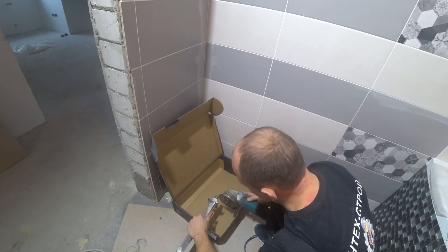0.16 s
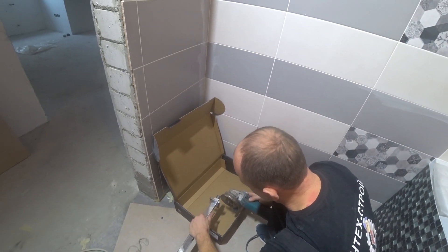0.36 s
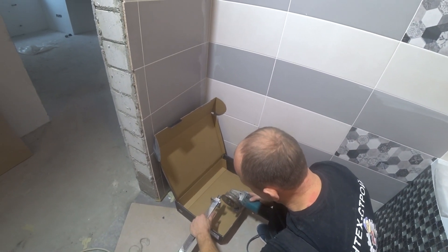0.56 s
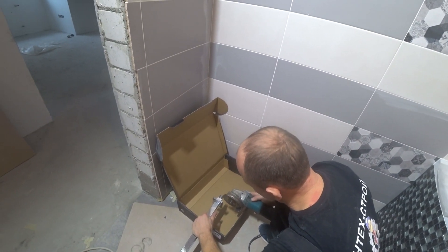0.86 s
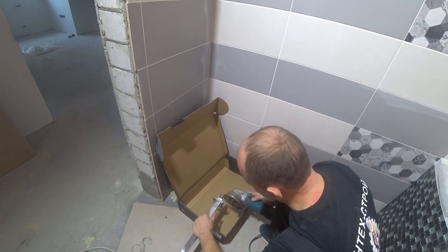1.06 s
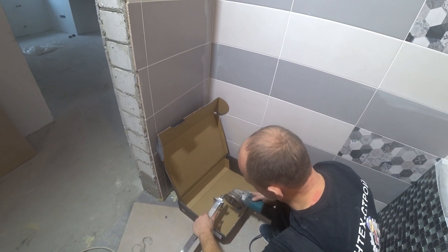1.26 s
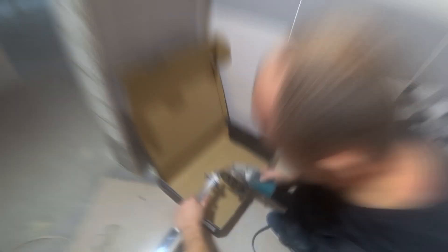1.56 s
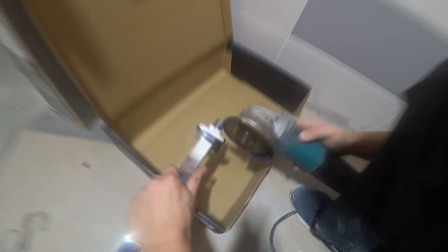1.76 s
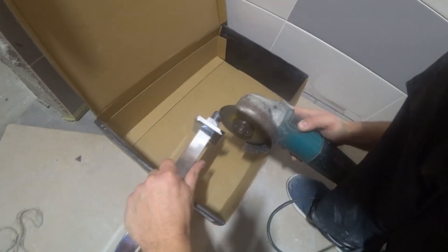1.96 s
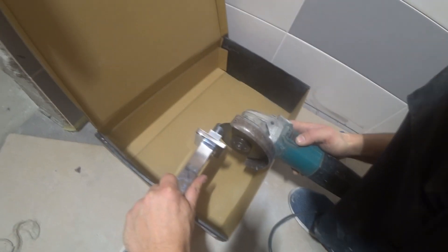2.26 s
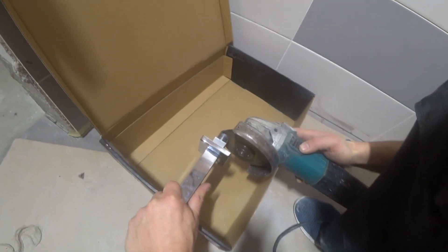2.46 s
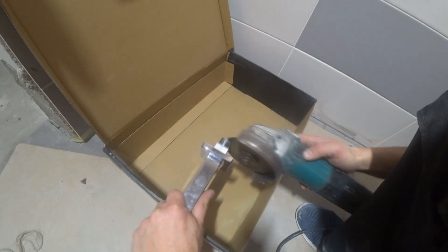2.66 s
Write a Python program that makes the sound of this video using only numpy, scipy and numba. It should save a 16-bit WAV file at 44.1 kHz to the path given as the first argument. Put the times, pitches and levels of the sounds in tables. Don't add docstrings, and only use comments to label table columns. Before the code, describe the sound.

An angle grinder cuts a metal sleeve in a small tiled room. From 0 to 1.3 seconds it is loud, dense and gritty, with ringing around 3 to 6 kHz and a rough metallic body. At 1.34 seconds it jumps abruptly to a quieter cut, its lows thinning toward 2.4 seconds with wavering metallic tones, then returning by 2.6. Faint motor whine, thin high squeal, short bright reverberation.

```python
import sys
import numpy as np
from scipy import signal
from scipy.fft import rfft, irfft, next_fast_len
from scipy.io import wavfile
from scipy.ndimage import map_coordinates
from numba import njit

SR = 44100
rng = np.random.default_rng(int(sys.argv[2]) if len(sys.argv) > 2 else 0)


def amplitude_ratio(level_db):
    exponent = np.asarray(level_db, float) / 20
    return 10 ** exponent


def to_wav(sig):
    pcm = np.clip(np.atleast_2d(sig), -1, 1) * 32767
    pcm = np.round(pcm).astype(np.int16)
    wavfile.write(sys.argv[1], SR, pcm.T)


N = 123479
SCENE_CHANGE_S = 1.340

# time in seconds, grinding level in dB, bite in dB.
CUTS = [
    [(0, -15, -9), (.1, -14, -11), (.26, -14.5, -13), (.44, -14.5, -9.5), (.59, -15, -8), (.81, -14, -12),
     (.93, -14, -8.5), (1.06, -15.5, -9), (1.335, -14, -12.5)],
    [(1.345, -23, -13.5), (1.49, -21, -11.5), (1.66, -20, -16.5), (1.84, -18.5, -19.5), (1.96, -19, -22),
     (2.1, -19.5, -26), (2.44, -19, -30), (2.58, -17.5, -17), (2.8, -19, -15)],
]
# frequency in Hz, level in dB.
GRIT_COLOUR = [(1100, -53), (1640, -26), (1800, -11.5), (3300, -1.5), (7000, -3.5), (8500, -11),
               (12500, -13.5), (16000, -26)]
# centre in seconds, treble lift in dB (below 0 darkens),
# length in seconds.
PUSHES = [(0.11, 1, 0.088), (0.335, 0.5, 0.07), (0.423, -4, 0.12), (0.497, -2.5, 0.03), (0.737, 1.5, 0.14),
          (.9, 0.5, .08), (1.057, 0, .06), (1.213, 1.5, 0.23), (1.405, 1.5, .15), (1.843, 1, 0.13),
          (2.24, -0.5, .08), (2.5, -0.5, 0.11)]
# frequency in Hz, width in Hz, level in dB.
FIRST_RINGS = [(2568, 40, -8), (3412, 30, -7), (3570, 30, -5), (3724, 36, -3), (3775, 26, -5),
               (4080, 34, -7), (4250, 36, -9), (4802, 60, -6), (5318, 36, -8), (5860, 50, -8),
               (6360, 70, -8), (7000, 60, -12), (11600, 160, -20)]
# frequency in Hz, width in Hz, level in dB.
SECOND_RINGS = [(2660, 90, -4), (3090, 60, -6), (3410, 50, -7), (3725, 45, -2), (4085, 40, -6),
                (4230, 50, -5), (4800, 80, -6), (5330, 60, -5), (6170, 45, -3), (6520, 45, -6),
                (6980, 45, -7), (7630, 50, -9), (10080, 300, -13), (11310, 200, -17)]
# centre in seconds, frequency in Hz, level in dB against the grinding, length in seconds.
FLARES = [(.2, 4810, -20, 0.23), (.21, 6220, -10, .08), (0.541, 3710, -4.5, 0.042),
          (0.676, 1975, -10, 0.061), (0.725, 5850, -10, .08), (0.834, 4010, -10, 0.15),
          (0.848, 1993, -9, 0.05), (1.048, 1112, -9, 0.044), (1.22, 5320, -13, 0.16),
          (1.257, 5930, -12, .14), (1.388, 1824, -6.5, 0.084), (1.436, 862, -16, 0.11),
          (1.466, 3660, -8.5, 0.32), (1.492, 1110, -14, 0.038), (1.54, 1964, -21, 0.4),
          (1.622, 990, -34, 0.073), (1.704, 6200, -12.5, 0.24), (1.784, 5350, -15, 0.25),
          (1.447, 4350, -12, 0.17), (1.617, 3490, -16.5, .15), (2.75, 3656, -9, 0.18),
          (1.81, 2110, -9.5, 0.092), (1.852, 1320, -20.5, 0.13), (1.882, 1785, -14, 0.14),
          (2.01, 1777, -13, 0.19), (1.907, 970, -27, 0.079), (1.915, 5900, -5, .1), (1.967, 6030, -9, 0.12),
          (1.938, 393.4, -32, 0.068), (2.044, 395, -30, 0.084), (1.98, 6650, -11, 0.48),
          (2.004, 1068, -24, 0.093), (2.155, 1055, -26.5, 0.25), (2.095, 2110, -28, .14),
          (2.09, 6570, -6, 0.27), (2.115, 6300, -7, 0.33), (2.3, 1330, -34, 0.49),
          (2.386, 1110, -22.5, 0.096), (2.396, 3007, -12.5, .3), (2.39, 1803, -23.5, 0.53),
          (2.524, 1480, -27, .1), (2.57, 1930, -14.5, 0.26), (2.532, 2400, -19, 0.17),
          (0.102, 1118, -17.5, 0.11), (0.57, 1120, -13, 0.081), (0.917, 1150, -16, 0.054),
          (2.757, 883, -27, .08), (2.547, 6060, -14, 0.33), (2.74, 2642, -13, 0.3)]
# frequency in Hz, level in dB.
FIRST_LOWS = [(100, -42), (300, -29.5), (600, -21), (760, -8.5), (860, -4.5), (1130, -1.5), (2000, -1),
              (4000, -7.5)]
# frequency in Hz, level in dB.
SECOND_LOWS = [(100, -47), (600, -33), (880, -13), (1130, -4), (1350, -5), (1580, -6.5), (1900, 0.5),
               (4000, -43)]
# frequency in Hz, width in Hz, level in dB.
SLEEVE_MODES = [(400, 30, -22), (875, 36, -5), (1127, 30, 0), (1273, 28, -2), (1600, 22, -3),
                (1780, 34, -4), (1971, 28, 1), (2120, 34, -3)]
# time in seconds, pitch in Hz, level in dB.
SQUEAL = [(0, 14170, -60), (.7, 14170, -54), (.78, 14170, -44), (.86, 14170, -51), (1.1, 14180, -42),
          (1.335, 14180, -41), (1.35, 14150, -60), (1.52, 14130, -60), (1.66, 14130, -46),
          (1.84, 14120, -50), (1.95, 14040, -38), (2.03, 13990, -45), (2.22, 13980, -47),
          (2.45, 14020, -51), (2.8, 14040, -60)]
# time in seconds, level in dB.
WHINE = [(0, -70), (.1, -44), (.26, -63), (.45, -37.5), (.56, -64), (.8, -56), (.93, -52), (1.1, -47.5),
         (1.33, -82), (1.44, -72), (1.49, -57), (1.6, -44), (1.68, -49), (1.73, -60), (1.83, -48.5),
         (1.97, -58), (2.58, -54), (2.73, -41)]
# frequency in Hz, level in dB.
RUMBLE_COLOUR = [(20, -12), (150, -8), (300, -5.5), (450, -1.5), (700, -4), (1200, -27)]
# frequency in Hz, side level against mid in dB.
ROOM_WIDTH = [(60, -24), (130, -22), (250, -19), (400, -12.5), (700, -9.5), (2400, -8), (4400, -10),
              (11500, -10.5), (12800, -17)]


@njit
def svf(x, g, k):
    y, b, l = np.empty(len(x)), 0., 0.
    for i in range(len(x)):
        v = (b + g[i] * (x[i] - l)) / (1 + g[i] * (g[i] + k))
        b = 2 * v - b
        l = l + 2 * g[i] * v
        y[i] = k * v
    return y


def band(x, hz, width_hz, drift):
    return svf(x, np.tan(np.pi * hz / SR) * (1 + drift), 1. * width_hz / np.mean(hz))


def steep(x, hz, width_hz, drift):
    once = band(x, hz, 1.27 * width_hz, drift)
    return band(once, hz, 1.27 * width_hz, drift)


def unit(x):
    return x / np.sqrt(np.mean(x ** 2))


def colour(x, table):
    hz, db = np.array(table, float).T
    n = next_fast_len(len(x), True)
    f = np.maximum(np.fft.rfftfreq(n, 1 / SR), 1)
    gain = amplitude_ratio(np.interp(np.log(f), np.log(hz), db))
    return irfft(rfft(x, n) * gain, n)[:len(x)]


def low_pass(order, hz):
    return signal.butter(order, hz, fs=SR, output="sos")


def treble_of(x, hz):
    return signal.sosfiltfilt(signal.butter(2, hz, "high", fs=SR, output="sos"), x)


def walk(rate):
    steps = rng.standard_normal(400)
    places = np.arange(N // 64 + 2) * 64 * min(rate, 100) / SR
    coarse = map_coordinates(steps, [places], mode="mirror")
    return np.interp(np.arange(N), np.arange(len(coarse)) * 64, coarse)


def bell(t, centre_s, length_s):
    return np.exp(-2 * ((t - centre_s) / (length_s / 2)) ** 2)


def control(column):
    t = np.arange(N) / SR
    first, second = (np.interp(t, np.array(cut)[:, 0], np.array(cut)[:, column]) for cut in CUTS)
    return np.where(t < SCENE_CHANGE_S, first, second)


def grit():
    grains_per_s, spread_db, turn_hz, turn_depth = 26000, 1.8, 170, 0.08
    struck = rng.random(N) < grains_per_s / SR
    force = amplitude_ratio(-spread_db * np.log(1 - rng.random(N)))
    hits = struck * force * rng.choice([-1., 1.], N)
    turn = np.cumsum(turn_hz * (1 + 0.0331 * walk(2.4))) / SR
    pulse = 1 + turn_depth * np.cos(2 * np.pi * turn)
    return unit(hits) * pulse * amplitude_ratio(.5 * walk(9.34) + 0.55 * walk(70))


def hiss(grains):
    spark_hz, spark_db, spark_per_bite = 9800, -10, 1
    base = unit(colour(grains, GRIT_COLOUR))
    spark_gain = amplitude_ratio(spark_db - spark_per_bite * (control(2) + 19))
    return surge(base + spark_gain * treble_of(base, spark_hz), grains)


def surge(x, grains):
    t = np.arange(N) / SR
    push_db = sum(db * bell(t, s, length) for s, db, length in PUSHES)
    gain = amplitude_ratio(.9 * walk(23.95) + push_db)
    sheen = unit(steep(grains, 9770, 280, np.zeros(N)))
    sheen_fade = 1 / (1 + np.exp((t - 0.98) / 0.042))
    return x + (gain - 1) * treble_of(x, 4500) + gain * amplitude_ratio(-18) * sheen * sheen_fade


def ring(grains, modes, patchy_db, rate):
    total = np.zeros(N)
    for hz, width_hz, db in modes:
        level = amplitude_ratio(db + patchy_db * walk(rate))
        total += level * steep(grains, hz, width_hz, 0.0022 * walk(3.79))
    return unit(total)


def rings(grains):
    ridge = amplitude_ratio(-12 + .8 * walk(20)) * unit(steep(grains, 3740, 110, 0.0013 * walk(6.9)))
    first = amplitude_ratio(-12.5) * ring(grains, FIRST_RINGS, patchy_db=6.5, rate=9.6) + ridge
    second = amplitude_ratio(-10.5) * ring(grains, SECOND_RINGS, patchy_db=2.5, rate=12)
    return np.where(np.arange(N) / SR < SCENE_CHANGE_S, first, second)


def flares(grains):
    out, waver = np.zeros(N), .004 * walk(14)
    for s, hz, db, length in FLARES:
        i = np.arange(max(int((s - length) * SR), 0), min(int((s + length) * SR), N))
        width_hz = .021 * hz ** .8 * 1500 ** .2
        sung = unit(steep(grains[i], hz, width_hz, waver[i]))
        out[i] += amplitude_ratio(db) * bell(i / SR, s, length) * sung
    return out


def sleeve(grains):
    bite_top_hz, deep_hz, deep_per_bite = 3000, 970, 1
    dull = signal.sosfilt(low_pass(2, bite_top_hz), grains[::-1])
    first = np.arange(N) / SR < SCENE_CHANGE_S
    lows = np.where(first, unit(colour(dull, FIRST_LOWS)), unit(colour(dull, SECOND_LOWS)))
    lows = lows * amplitude_ratio(.6 * walk(11.9))
    body = amplitude_ratio(3) * lows + amplitude_ratio(-3.5) * ring(grains, SLEEVE_MODES, patchy_db=0.5, rate=8.64)
    deep = signal.sosfiltfilt(low_pass(3, deep_hz), body)
    deep_gain = amplitude_ratio(deep_per_bite * np.minimum(control(2) + 11, 0))
    return amplitude_ratio(control(2)) * (body + (deep_gain - 1) * deep)


def squeal():
    t = np.arange(N) / SR
    when, hz, db = np.array(SQUEAL).T
    tone = band(rng.standard_normal(N), np.interp(t, when, hz), 110, .002 * walk(15))
    return unit(tone) * amplitude_ratio(np.interp(t, when, db) + 1.5 * walk(16))


def grinder():
    grains = grit()
    contact = amplitude_ratio(0.08) * hiss(grains) + rings(grains) + flares(grains) + sleeve(grains)
    return amplitude_ratio(control(1)) * contact + squeal()


def motor():
    armature_hz = 565.2 * (1 + .007 * walk(25))
    tone = np.sqrt(2) * np.sin(2 * np.pi * np.cumsum(armature_hz) / SR)
    whine_db = np.interp(np.arange(N) / SR, *np.array(WHINE).T) + 1.5 * walk(18)
    rumble_db = -60.5 + 0.43 * (control(1) + 28.0)
    rumble = unit(colour(rng.standard_normal(N), RUMBLE_COLOUR))
    return tone * amplitude_ratio(whine_db) + amplitude_ratio(rumble_db) * rumble


def tiles(x):
    t60_s, first_echo_s = .3, .004
    t = np.arange(SR // 4) / SR
    tail = rng.standard_normal(len(t)) * amplitude_ratio(-60 * t / t60_s) * (t > first_echo_s)
    tail = tail / np.sqrt(np.sum(tail ** 2))
    before = np.concatenate([x[len(t):0:-1], x])
    return signal.fftconvolve(before, tail)[len(t):len(t) + N]


def scene():
    room_db, side_db, fade_out_s, fade_in_s = -12, 0.1, .006, .003
    t, gain = np.arange(N) / SR, amplitude_ratio(control(1))
    source = (grinder() + motor()) / gain
    mid = (source + amplitude_ratio(room_db) * tiles(source)) / np.hypot(1, amplitude_ratio(room_db))
    side = amplitude_ratio(side_db) * colour(tiles(source), ROOM_WIDTH)
    fade_out, fade_in = (SCENE_CHANGE_S - t) / fade_out_s, (t - SCENE_CHANGE_S) / fade_in_s
    fade = np.clip(np.maximum(fade_out, fade_in), 0, 1)
    return gain * fade * np.array([mid + side, mid - side])


def top_cut(x):
    return signal.sosfilt(signal.butter(12, 15800, fs=SR, output="sos"), x)


def record(dry):
    ceiling, top_hz = .62, 15745
    room = 1 - ceiling
    over = np.maximum(np.abs(dry) - ceiling, 0)
    soft = dry - np.sign(dry) * (over - room / 2 * np.tanh(2 * over / room))
    mix = signal.sosfilt(signal.ellip(14, .3, 30, top_hz, fs=SR, output="sos"), soft)
    return top_cut(mix)


dry = scene()
out = record(dry)
to_wav(out)
```